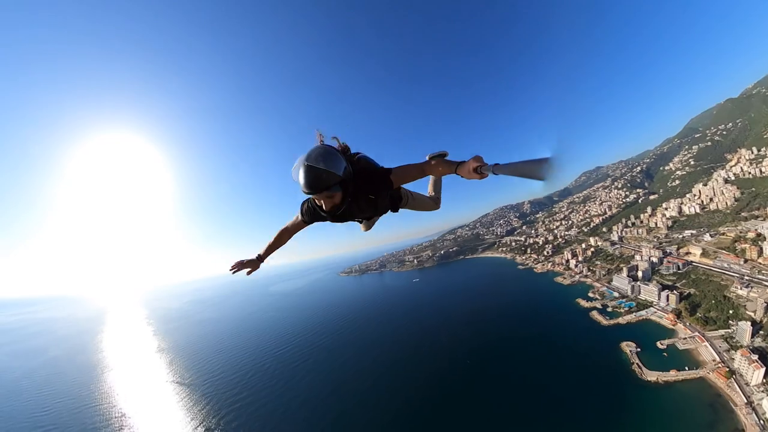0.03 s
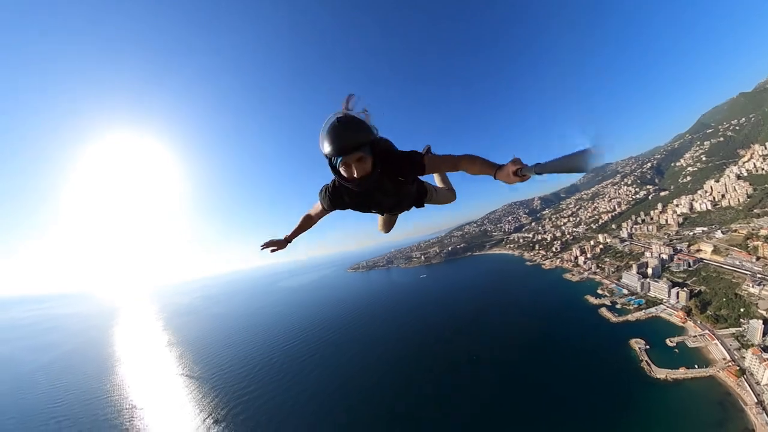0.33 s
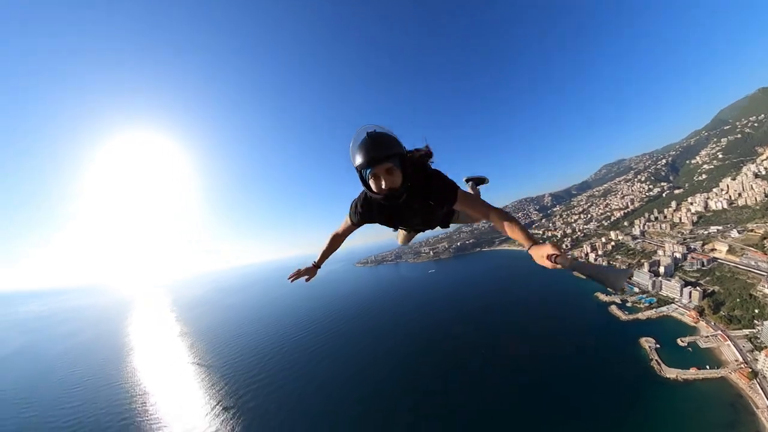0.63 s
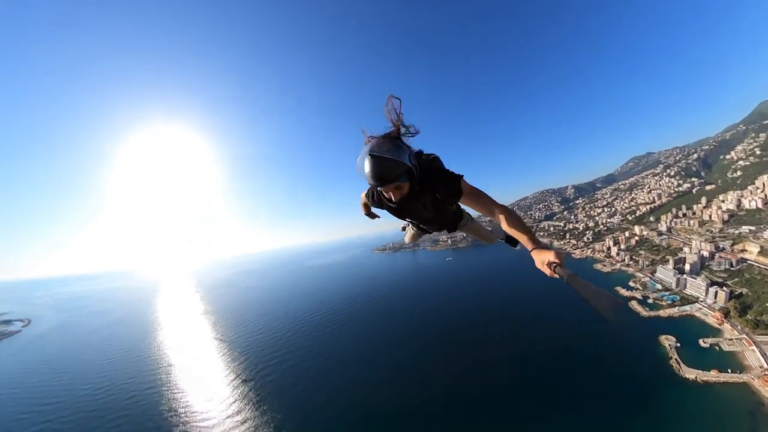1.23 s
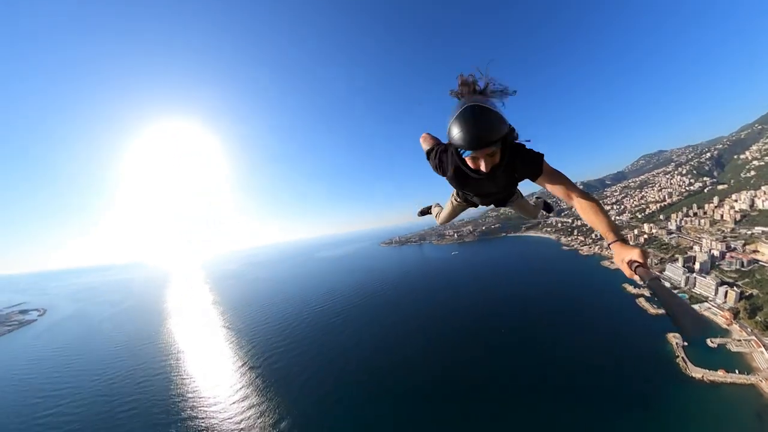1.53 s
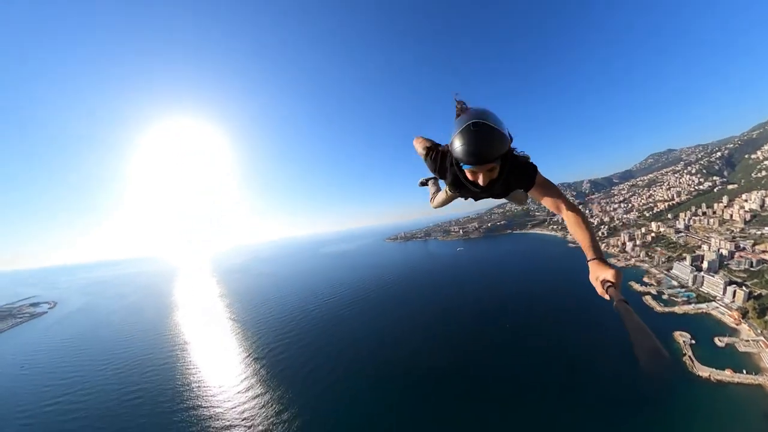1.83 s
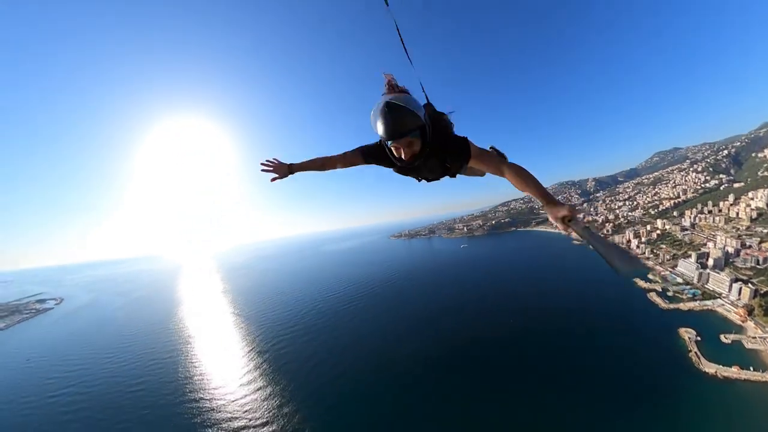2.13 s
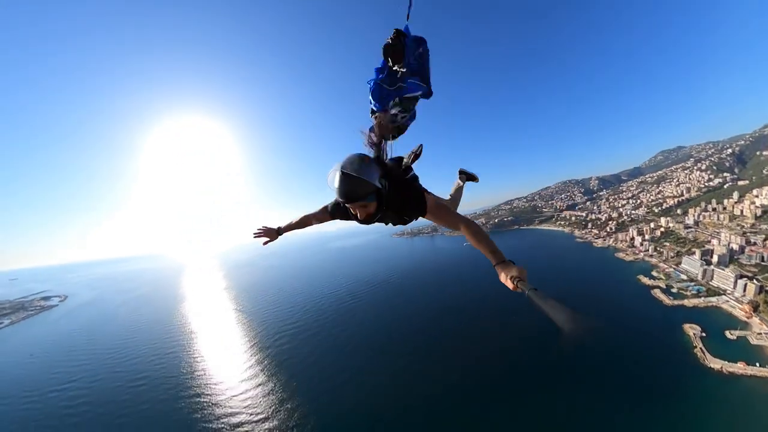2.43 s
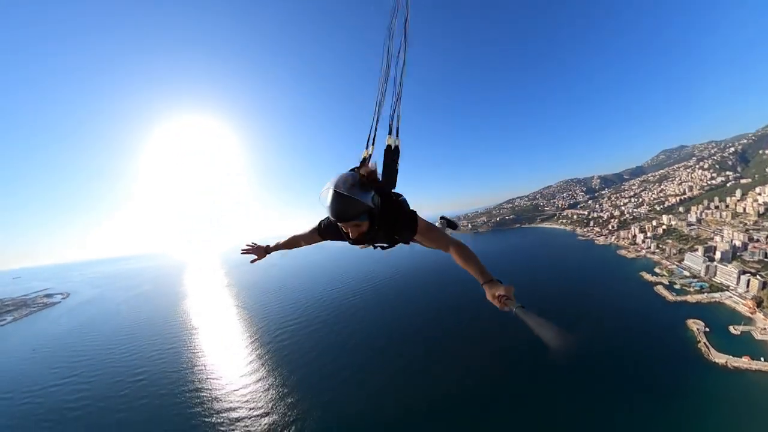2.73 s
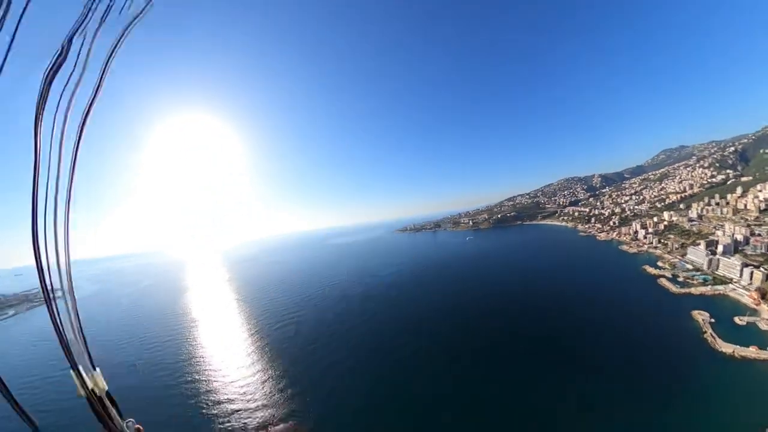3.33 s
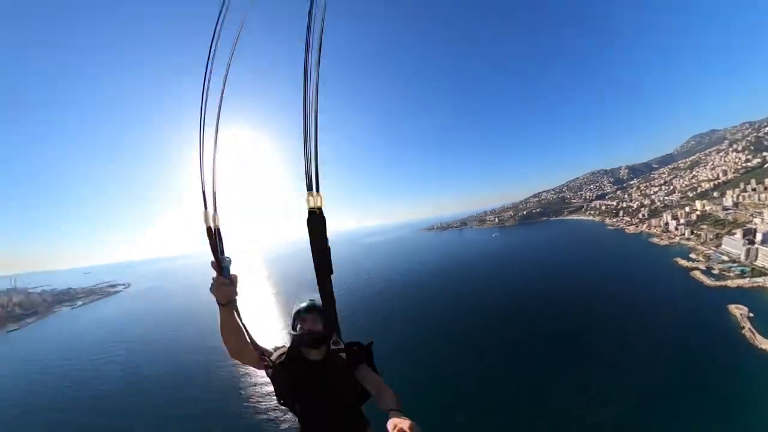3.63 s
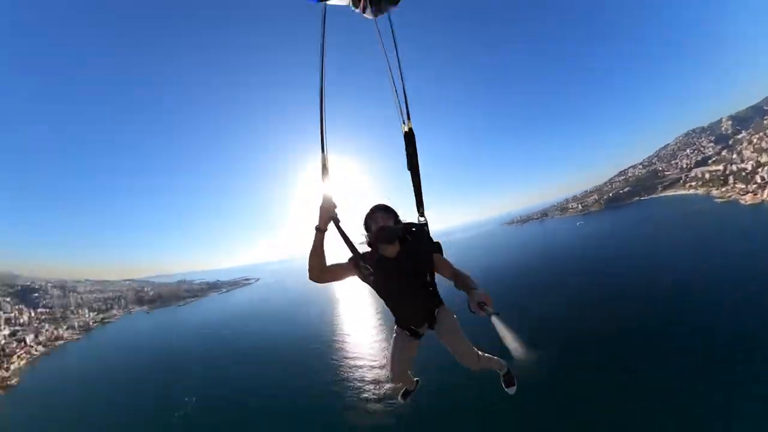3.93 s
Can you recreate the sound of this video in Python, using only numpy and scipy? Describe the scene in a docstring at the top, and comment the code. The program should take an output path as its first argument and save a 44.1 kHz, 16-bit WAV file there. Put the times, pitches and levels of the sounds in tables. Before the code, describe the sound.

Rushing, rumbling skydiving wind, ending in the flaps and snaps of an opening parachute.

```python
"""Freefall, heard by a camera on a pole. Wind pounds the microphone; in the first second, eddies shed
by the pole drone and the pole swishes as it swings. The wake of the jumper's body then builds to a
low throb, and the parachute is pulled out with a few flaps and rustles. Just after three seconds it
opens: the camera is whipped through rough air, with loud buffeting, flaps and snapping lines,
until the fall is braked and the wind drops away."""
import sys
import numpy as np
from scipy import signal
from scipy.fft import rfft, irfft, next_fast_len
from scipy.io import wavfile
from scipy.ndimage import uniform_filter1d, minimum_filter1d

SR = 44100
rng = np.random.default_rng(int(sys.argv[2]) if len(sys.argv) > 2 else 0)


def pcm_store(signal):
    """Save signal as 16-bit PCM."""
    levels = np.round(np.clip(np.atleast_2d(signal), -1, 1) * 32767)
    wavfile.write(sys.argv[1], SR, levels.astype(np.int16).T)


N = 176400
T = np.arange(N) / SR

# Wind pounding the microphone. Each row: time in seconds, relative level in dB.
POUNDING = [(0, -16), (0.22, -29.5), (0.3, -22.5), (0.55, -19), (0.8, -19), (1.05, -21), (1.2, -27),
            (1.5, -21), (1.95, -18.5), (2.3, -20.5), (2.6, -15), (2.9, -19.5), (3.12, -18), (3.25, -16.5),
            (3.42, -15.5), (3.55, -16), (3.66, -17), (3.76, -27.5), (3.785, -28.5), (3.87, -26.5), (4, -38)]
# Air streaming past the camera. Each row: time in seconds, relative levels of rush and hiss in dB.
AIRFLOW = [(0.02, -45, -52), (0.19, -48.5, -59.5), (0.3, -44.5, -51.5), (0.42, -43.5, -46.5),
           (0.52, -37, -48), (0.6, -33.5, -44.5), (0.7, -39, -51), (0.77, -38, -52.5), (0.86, -37, -49.5),
           (0.98, -36, -51.5), (1.12, -45, -54.5), (1.3, -40, -55), (1.6, -42, -54), (1.82, -41.5, -55.5),
           (1.9, -45, -55.5), (2.3, -43.5, -55.5), (2.58, -38.5, -55.5), (2.85, -44, -57),
           (3.08, -47, -59.5), (3.76, -49.5, -61), (3.81, -48.5, -66), (3.89, -58, -76), (4, -58, -82)]
# Tone of the deep pounding, the low-mid rush and the bright hiss. Each row: frequency in Hz, gain in dB.
POUNDING_COLOUR = [(12, -16.5), (25, 3), (50, -1.5), (120, -2.5), (180, -10.5), (260, -16.5), (400, -30),
                   (800, -49.5), (2000, -96.5)]
RUSH_COLOUR = [(60, -10.5), (170, 3), (280, 6), (420, -4), (560, -3.5), (800, -6.5), (1200, -13.5),
               (1800, -22), (3000, -35), (6000, -51), (12000, -86)]
HISS_COLOUR = [(500, -29.5), (1500, 0), (2600, -1), (4000, -4.5), (5500, -10), (7000, -16.5), (9000, -27.5),
               (12000, -34), (15000, -58.5)]

# Rough air as the canopy opens. Each row: time in seconds, levels of shake, roar and tear in dB.
BUFFET = [(3.08, -36.5, -56, -73), (3.108, -31.5, -42, -56), (3.122, -25, -36, -44), (3.16, -23, -31, -36),
          (3.185, -19, -19.5, -43), (3.205, -16, -18.5, -51), (3.23, -14.5, -16, -45),
          (3.245, -10, -18.5, -41), (3.268, -18, -17, -33.5), (3.305, -13, -21, -43),
          (3.35, -12.5, -21, -48), (3.4, -24, -28, -44), (3.48, -26, -26.5, -41), (3.55, -26, -30.5, -46.5),
          (3.578, -18.5, -21, -38), (3.588, -19.5, -24, -41), (3.6, -19.5, -22.5, -44),
          (3.63, -27, -20.5, -49), (3.66, -32, -25.5, -41.5), (3.685, -22.5, -26, -44),
          (3.7, -24, -29.5, -47.5), (3.718, -21, -28, -41), (3.735, -24.5, -31.5, -43),
          (3.76, -15.5, -29, -43.5), (3.785, -37.5, -49, -48), (3.82, -54.5, -54.5, -67)]
# Tone of the low shake, the mid roar and the tearing treble. Each row: frequency in Hz, gain in dB.
SHAKE_COLOUR = [(50, -18.5), (100, -4), (150, 0), (210, -3), (320, -4), (420, -10.5), (700, -36.5),
                (2000, -80)]
ROAR_COLOUR = [(100, -24.5), (220, -7), (330, 0.5), (480, -2), (700, -4.5), (1100, -11), (1600, -20.5),
               (2500, -27), (5000, -44.5), (12000, -80.5)]
TEAR_COLOUR = [(600, -30.5), (1600, 6.5), (2600, 1.5), (4000, -3), (5500, -8.5), (7000, -18.5),
               (9000, -24.5), (11500, -27.5), (15000, -50.5)]
# Flap hits. Each row: centre in seconds, peak pressure in dB, half the gap from suction to push
# in seconds, crack level in dB, crack decay in seconds.
FLAPS = [(1.825, -20.5, 0.00078, -38, 0.0096), (2.274, -19, 0.0014, -49, 0.0062),
         (3.185, -8.5, 0.0011, -19, 0.0057), (3.192, -3, 0.00093, -19.5, 0.0026),
         (3.27, -14, 0.00088, -22, 0.0035), (3.295, -12, 0.0013, -23, 0.0035),
         (3.343, -12, 0.0011, -26.5, 0.0029), (3.502, -11, 0.0013, -31, 0.002),
         (3.517, -9.5, 0.00076, -27, 0.0034), (3.575, -7, 0.00032, -12.5, 0.0025),
         (3.606, -24, 0.001, -18, 0.0052), (3.652, -10, 0.0021, -24.5, 0.008),
         (3.684, -13, 0.0027, -27.5, 0.003), (3.696, -9.5, 0.0043, -30.5, 0.0057),
         (3.718, -10, 0.00047, -25.5, 0.0026), (3.7255, -8.5, 0.0029, -29, 0.0021),
         (3.7497, -5.5, 0.0021, -39.5, 0.0027), (3.764, -16, 0.00055, -26, 0.0024),
         (3.7697, -7, 0.0018, -45, 0.0037)]
# Tone of a flap's crack. Each row: frequency in Hz, gain in dB.
CRACK_COLOUR = [(150, -3.5), (600, 7), (1400, 0), (2500, -15.5), (5000, -22.5), (8000, -45.5),
                (12000, -47.5), (15000, -59)]

# Bass throb behind the jumper's body. Each row: time in seconds, pitch in Hz, level in dB.
THROB = [(0, 59.97, -47.5), (1.2, 60, -30), (1.55, 65.85, -23), (1.9, 61.89, -23.5), (2.4, 65.73, -24),
         (2.8, 63.63, -20.5), (3.05, 58.1, -20), (3.3, 63.24, -32), (3.5, 71.9, -28), (3.75, 78.07, -24),
         (3.79, 71.56, -38.5), (4, 62, -33)]
# Swells of the pole's drone. Each row: centre and length in seconds, start and end pitch in Hz,
# level in dB.
DRONE = [(0.192, 0.087, 338, 320, -24), (0.295, 0.08, 323.8, 335.4, -21.5), (0.404, 0.043, 354.2, 343, -20),
         (0.442, 0.061, 333, 322, -23.5), (0.527, 0.077, 323, 338, -17), (0.635, 0.06, 330, 350, -22.5),
         (0.711, 0.074, 352, 338, -21), (0.77, 0.046, 387.5, 364, -22.5), (0.825, 0.066, 346, 345, -21.5),
         (0.984, 0.055, 388, 390, -24)]
# The hollow wake around that drone. Each row: time in seconds, band centre in Hz, level in dB.
WAKE = [(0, 318.2, -30), (0.22, 330, -37), (0.37, 335.2, -23.5), (0.56, 330, -26), (0.8, 340, -31),
        (1.0, 334.6, -27.5), (1.25, 330, -29), (1.45, 398.8, -35.5), (1.8, 421.3, -32.5), (2.0, 404.8, -37),
        (2.3, 421.6, -35), (2.55, 369.2, -38), (2.9, 346.3, -50), (3.2, 344, -63)]
# Swishes of an edge in the stream. Each row: centre and length in seconds, start and end pitch in Hz,
# spread in Hz, level in dB.
SWISHES = [(0.405, 0.17, 5300, 5940, 1100, -54), (0.405, 0.15, 9140, 9300, 1500, -66),
           (0.6, 0.0795, 760, 1020, 200, -35.5), (0.637, 0.04, 1050, 2107, 302.4, -29.5),
           (0.659, 0.058, 2000, 4100, 464.4, -35), (0.656, 0.066, 5200, 4400, 896.4, -41.5),
           (0.631, 0.07, 5100, 6900, 2130, -49.5), (0.715, 0.099, 4530, 5260, 735, -52.5),
           (3.16, 0.024, 4900, 3900, 720, -38), (3.182, 0.028, 2900, 1600, 710, -34.5),
           (3.228, 0.045, 2700, 3000, 660, -36), (3.45, 0.22, 7600, 6200, 1100, -59.5),
           (3.608, 0.085, 4900, 1990, 1050, -36)]

# Rustles of pack, lines and harness. Each row: peak time in seconds, level in dB, band centre in Hz,
# decay in seconds.
RUSTLES = [(2.3552, -31.5, 1150, 0.0046), (2.356, -46, 2400, 0.006), (2.939, -54, 4980, 0.013),
           (3.021, -57.5, 6000, 0.013), (3.123, -48, 3800, 0.0073), (3.267, -46, 5500, 0.0049),
           (3.344, -34.5, 3600, 0.0044), (3.565, -45, 5800, 0.005), (3.649, -46, 4500, 0.0024),
           (3.749, -37.5, 3300, 0.006), (3.837, -57, 4500, 0.017), (3.87, -63, 4700, 0.015),
           (3.908, -56, 2200, 0.0046), (3.928, -58.5, 2700, 0.0092)]
# Fabric and lines pulling taut. Each row: peak time in seconds, level in dB, band centre in Hz.
SNAPS = [(3.313, -42.5, 5500), (3.321, -40, 6800), (3.330, -43.5, 6500), (3.334, -40, 7500),
         (3.371, -46.5, 7500), (3.377, -41, 6500), (3.447, -41, 5000), (3.483, -33, 4500),
         (3.579, -36, 7500), (3.6556, -29.5, 5040), (3.719, -46, 5200), (3.753, -45, 7000),
         (3.758, -41, 6000)]


def freefall_wind(eddies):
    """Eddies pound the microphone and make the rush and hiss of the airflow flutter."""
    pounding_db, = curves(POUNDING)
    rush_db, hiss_db = curves(AIRFLOW)
    rush = steadied(noise(RUSH_COLOUR) * amp(1.5 * eddies + 0.66 * wobble(110)), samples=3500)
    hiss = unit(noise(HISS_COLOUR) * amp(0.6 * eddies + 0.5 * wobble(21)))
    return amp(pounding_db + 0.45) * eddies + amp(rush_db + 9.0) * rush + amp(hiss_db + 1.0) * hiss


def buffeting(eddies):
    """Separated air shakes the microphone, and roars and tears in fast, uneven bursts."""
    shake_db, roar_db, tear_db = curves(BUFFET)
    bursts = wobble(170)
    shake = steadied(noise(SHAKE_COLOUR), samples=1200)
    roar = steadied(noise(ROAR_COLOUR) * amp(2.0 * bursts), samples=1200)
    tear = unit(noise(TEAR_COLOUR) * amp(1.2 * bursts + 0.6 * eddies + 1.9 * wobble(820)))
    return amp(shake_db) * shake + amp(roar_db) * roar + amp(tear_db) * tear


def flaps():
    """Each flap is one swing of pressure, suction then push, topped with a short crack."""
    pressure, crack_envelope = np.zeros(N), np.zeros(N)
    for centre_s, pressure_db, half_gap_s, crack_db, decay_s in FLAPS:
        swing = (T - centre_s) / half_gap_s
        pressure += amp(pressure_db) * swing * np.exp((1 - swing ** 2) / 2)
        crack_envelope += amp(crack_db) * spike(centre_s, attack_s=0.0012, decay_s=decay_s)
    return pressure + crack_envelope * steadied(noise(CRACK_COLOUR), samples=150)


def body_throb():
    """Large eddies behind the jumper beat on the microphone at a fairly even rate."""
    pitch_hz, level_db = curves(THROB)
    return amp(level_db) * steadied(pitched_noise(pitch_hz, spread_hz=8.7), samples=4400)


def pole_drone():
    """Eddies shed by the pole drone in short, gliding swells over a broad, hollow wake."""
    wake_hz, wake_db = curves(WAKE)
    layer = amp(wake_db) * steadied(pitched_noise(wake_hz, spread_hz=70), samples=3000)
    for centre_s, length_s, start_hz, end_hz, db in DRONE:
        pitch_hz, envelope = gliding_swell(centre_s, length_s, start_hz, end_hz)
        layer += amp(db) * envelope * steadied(pitched_noise(pitch_hz, spread_hz=11.3), samples=1500)
    return layer


def swishes():
    """An edge turning through the stream gives a gliding swish; turbulence makes it rasp."""
    layer = np.zeros(N)
    for centre_s, length_s, start_hz, end_hz, spread_hz, db in SWISHES:
        pitch_hz, envelope = gliding_swell(centre_s, length_s, start_hz, end_hz)
        layer += amp(db) * envelope * pitched_noise(pitch_hz, spread_hz)
    rasp = steadied(amp(wobble(375)), samples=700)
    return layer * rasp


def rustles():
    """Fabric and webbing brush briefly, each stroke rising twice as fast as it fades."""
    return sum(amp(db) * fabric_noise(centre_hz) * spike(peak_s, 0.5 * decay_s, decay_s)
               for peak_s, db, centre_hz, decay_s in RUSTLES)


def snaps():
    """Fabric and lines give sharp, bright ticks as they come under load."""
    return sum(amp(db) * fabric_noise(centre_hz) * spike(peak_s, attack_s=0.0003, decay_s=0.00062)
               for peak_s, db, centre_hz in SNAPS)


def fabric_noise(centre_hz, spread_octaves=0.52, top_hz=7760):
    """The raw texture of cloth: a steady band of noise with its top rolled off."""
    def response(f):
        octaves = np.log2((f + 1) / centre_hz)
        return np.exp(-0.5 * (octaves / spread_octaves) ** 2) / (1 + (f / top_hz) ** 8)
    return steadied(unit(filtered(rng.standard_normal(N), response)), samples=200)


def pitched_noise(pitch_hz, spread_hz):
    """A band of noise riding a moving pitch; more spread makes it breathier."""
    def response(f):
        return 1 / (1 + (f / (1.34 * spread_hz)) ** 4) ** 0.82
    cosine_gain, sine_gain = [filtered(rng.standard_normal(N), response) for _ in range(2)]
    phase = 2 * np.pi * np.cumsum(pitch_hz) / SR
    return unit(cosine_gain * np.cos(phase) + sine_gain * np.sin(phase))


def noise(colour):
    """Noise of rms 1, equalised by a colour table."""
    hz, db = np.transpose(colour)
    white = rng.standard_normal(N)
    return unit(filtered(white, lambda f: amp(np.interp(np.log(f + 1), np.log(hz), db))))


def gliding_swell(centre_s, length_s, start_hz, end_hz):
    """The pitch glide and arched envelope of one swell."""
    progress = np.clip((T - centre_s) / length_s + 0.5, 0, 1)
    pitch_hz = start_hz * (end_hz / start_hz) ** progress
    return pitch_hz, np.sin(np.pi * progress) ** 1.03


def spike(peak_s, attack_s, decay_s):
    """An envelope that rises and falls exponentially around its peak."""
    return np.exp(-np.maximum((peak_s - T) / attack_s, (T - peak_s) / decay_s))


def wobble(knots_per_s):
    """A smooth random modulator."""
    smooth = signal.resample(rng.standard_normal(4096), 4 * 4096)
    return np.interp(T * knots_per_s, np.arange(len(smooth)) / 4, smooth)


def steadied(x, samples):
    """Ride the gain to hold the rms near 1 over a sliding window."""
    return x / np.sqrt(np.abs(uniform_filter1d(x * x, samples)) + 1e-9)


def filtered(x, response):
    """Equalise x by a gain given as a function of Hz."""
    size = next_fast_len(N + 8192)
    return irfft(rfft(x, size) * response(np.fft.rfftfreq(size, 1 / SR)), size)[:N]


def curves(rows):
    """One automation curve for each column after the time."""
    times, *columns = np.transpose(rows)
    return [np.interp(T, times, column) for column in columns]


def amp(db):
    return 10 ** (np.asarray(db) / 20)


def unit(x):
    return x / np.sqrt(np.mean(np.abs(x) ** 2) + 1e-20)


def scene():
    """Air and fabric mixed in mono; the same eddies stir the wind and the tearing treble."""
    eddies = steadied(noise(POUNDING_COLOUR), samples=2600)
    air = freefall_wind(eddies) + body_throb() + pole_drone() + swishes() + buffeting(eddies)
    return (air + flaps() + rustles() + snaps())[None]


def record(dry):
    """A fast limiter holds the peaks down, then a steep low-pass cuts the very top."""
    ceiling_db, limiter_samples, top_hz = -3, 301, 15100
    needed_gain = np.minimum(1, amp(ceiling_db) / (np.abs(dry[0]) + 1e-9))
    held_gain = minimum_filter1d(needed_gain, limiter_samples)
    smooth_gain = uniform_filter1d(held_gain, limiter_samples)
    return filtered(dry[0] * smooth_gain, lambda f: f < top_hz)[None]


dry = scene()
out = record(dry)
pcm_store(out)
```